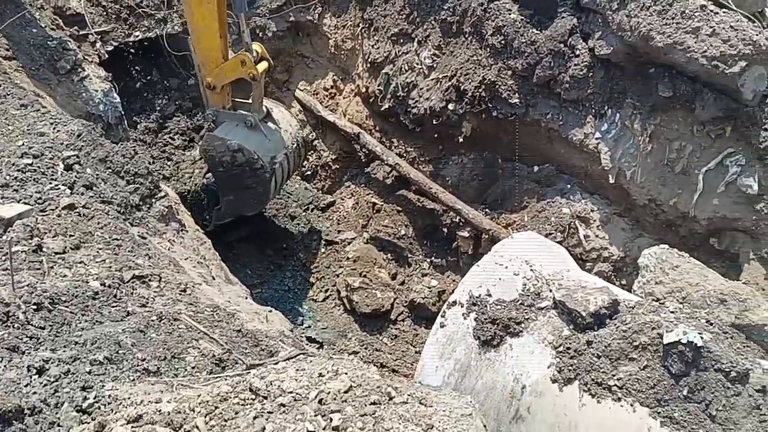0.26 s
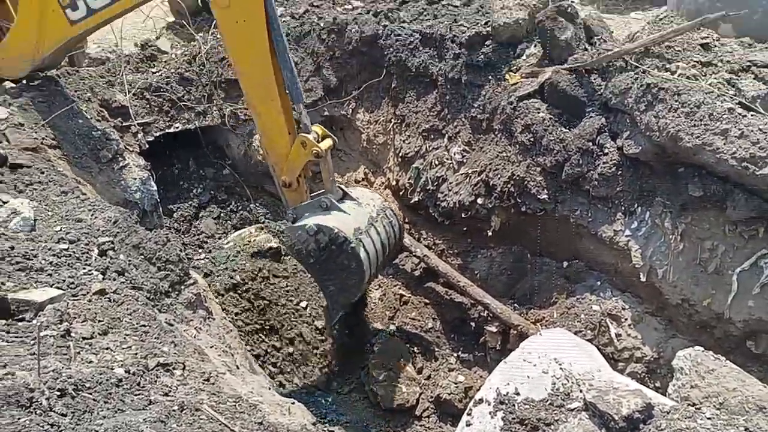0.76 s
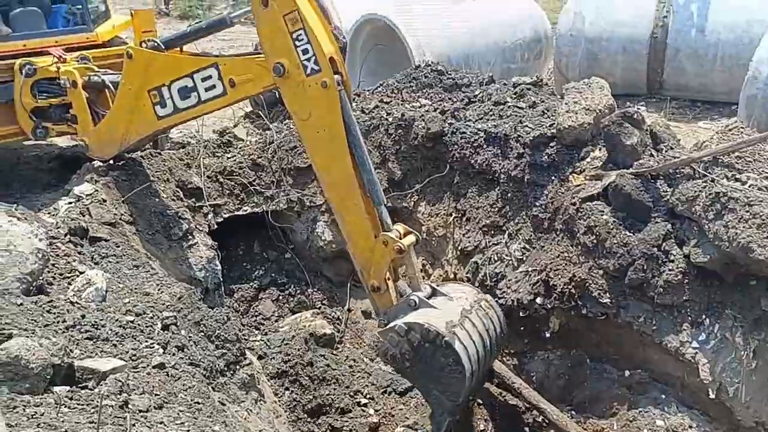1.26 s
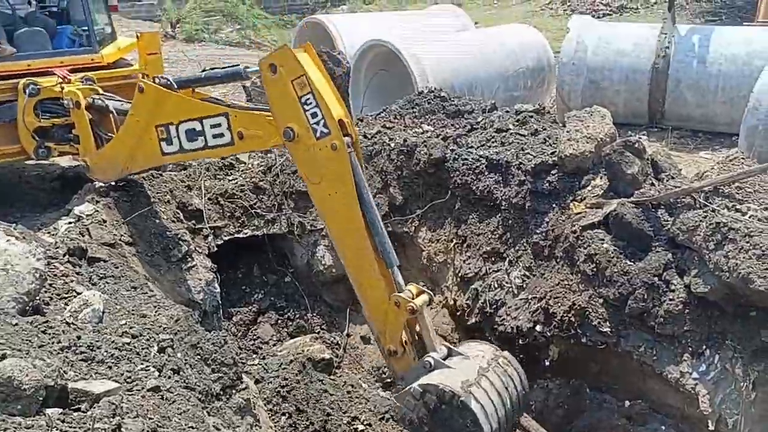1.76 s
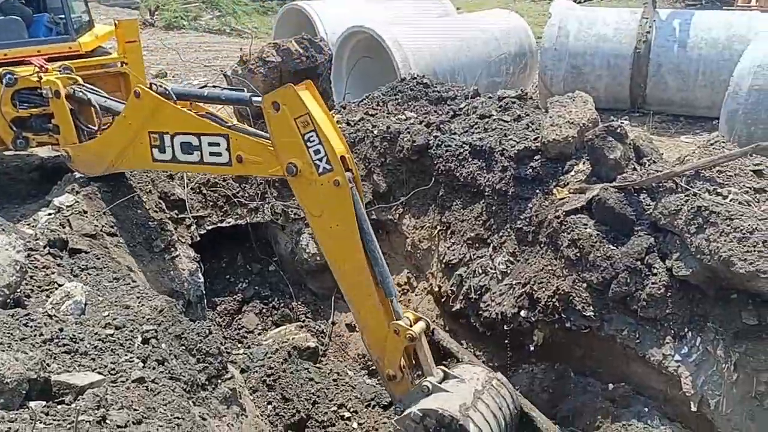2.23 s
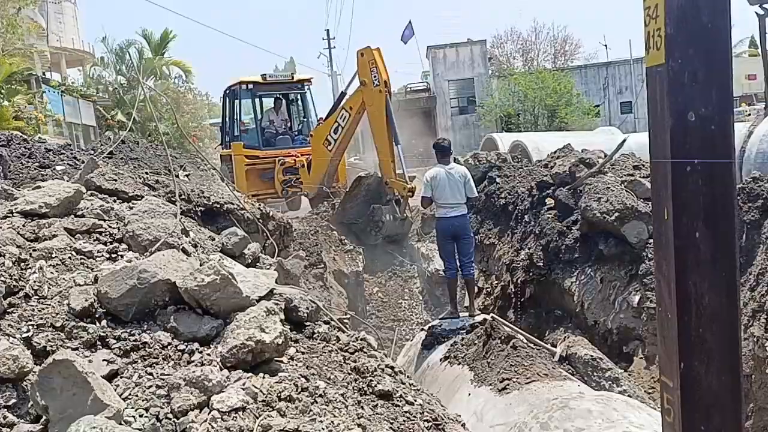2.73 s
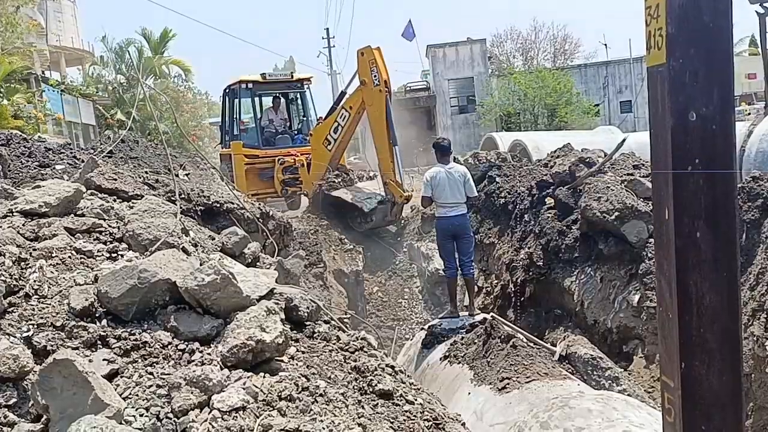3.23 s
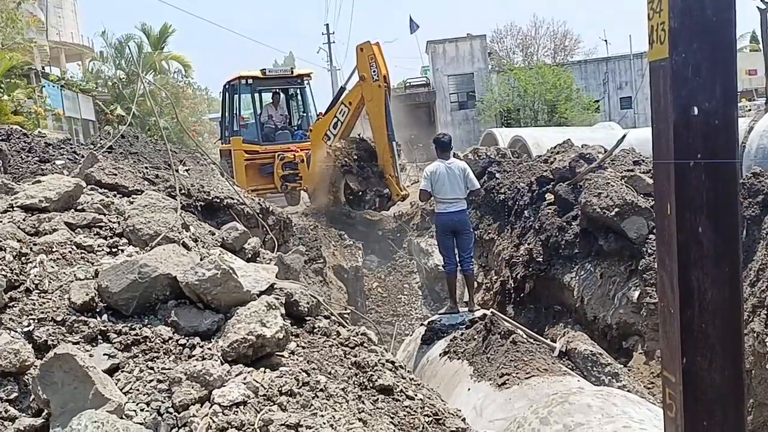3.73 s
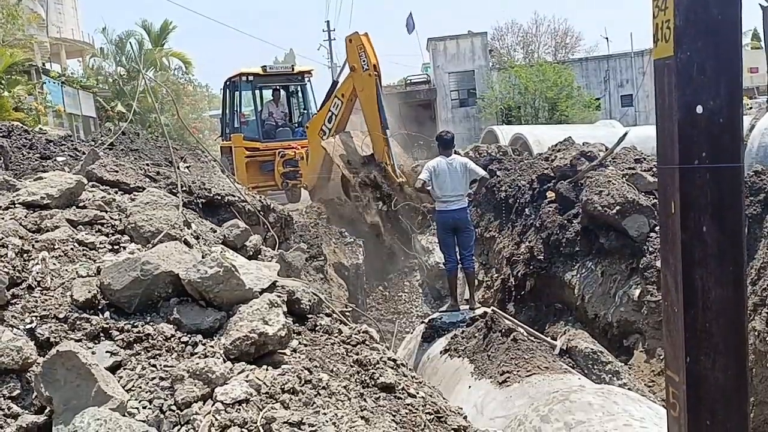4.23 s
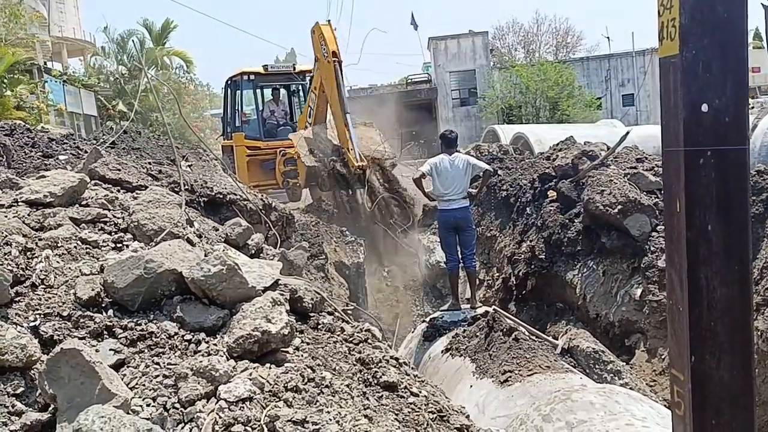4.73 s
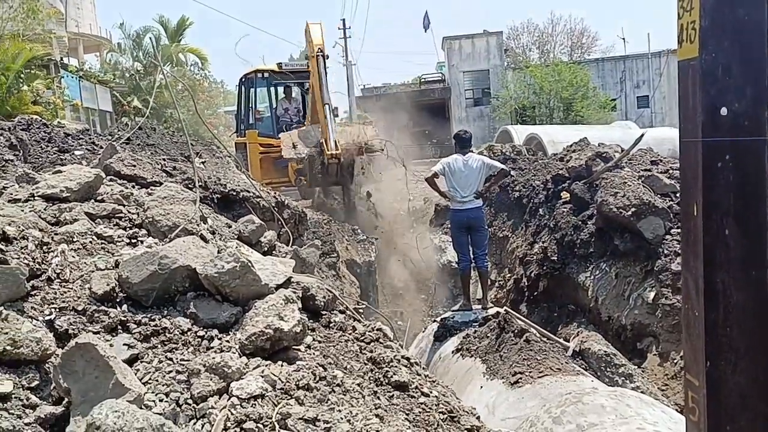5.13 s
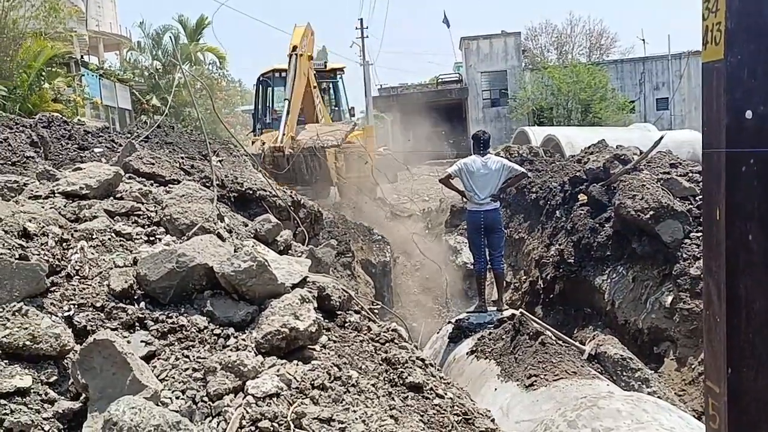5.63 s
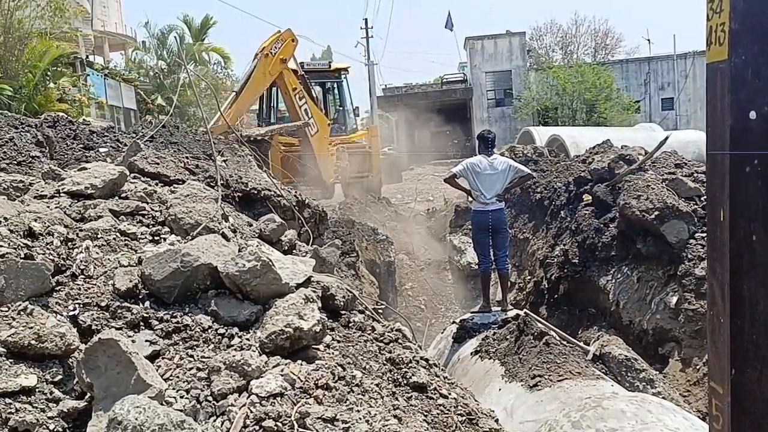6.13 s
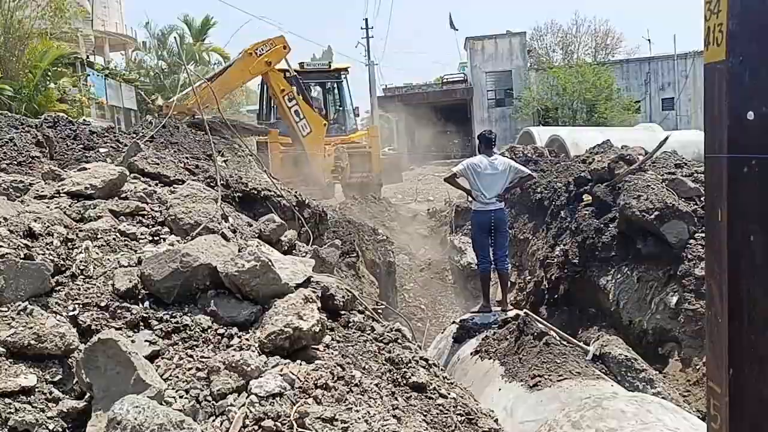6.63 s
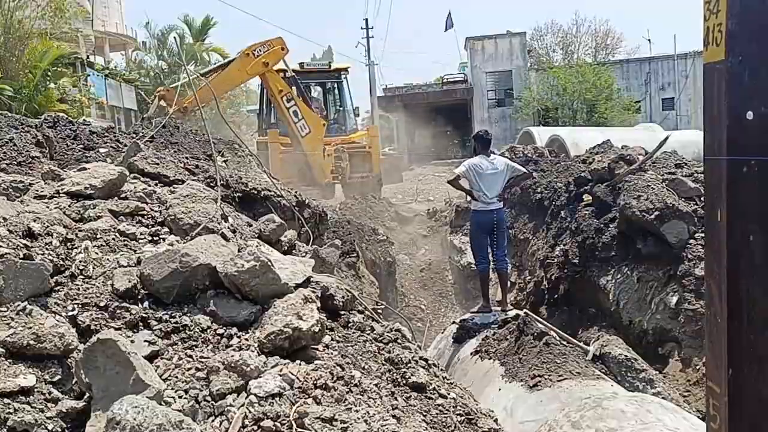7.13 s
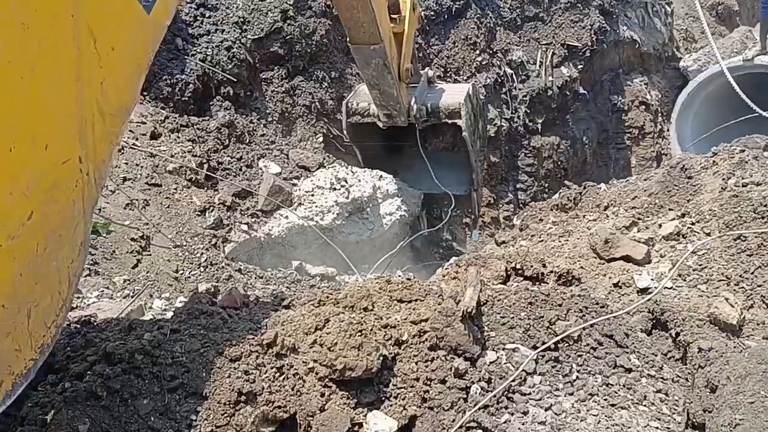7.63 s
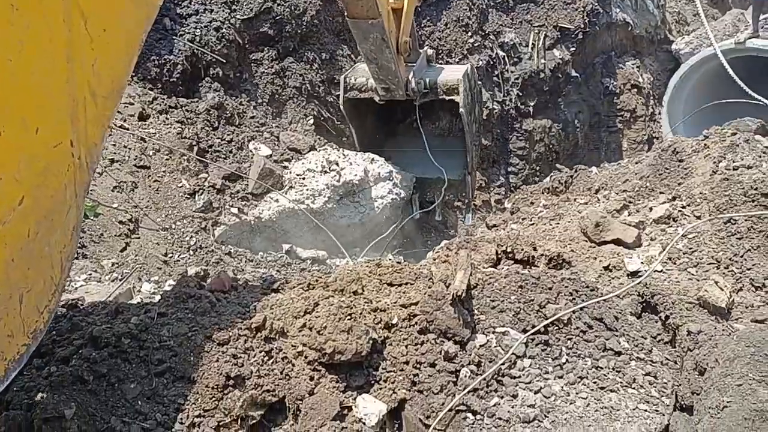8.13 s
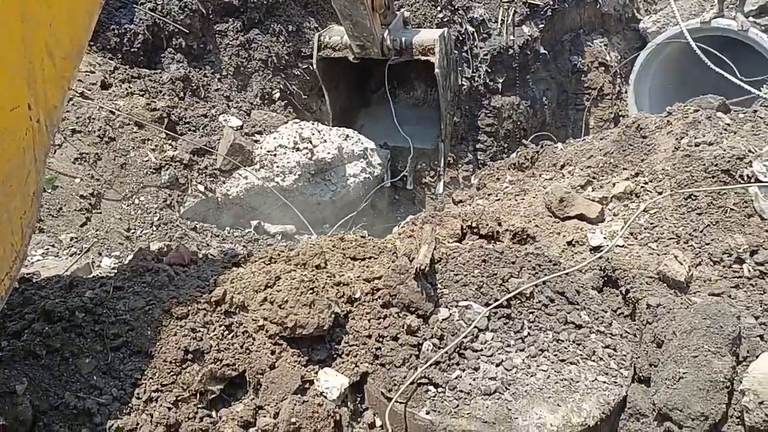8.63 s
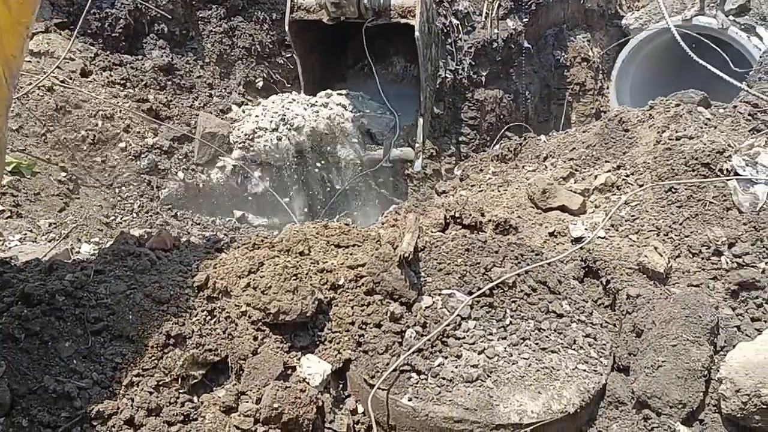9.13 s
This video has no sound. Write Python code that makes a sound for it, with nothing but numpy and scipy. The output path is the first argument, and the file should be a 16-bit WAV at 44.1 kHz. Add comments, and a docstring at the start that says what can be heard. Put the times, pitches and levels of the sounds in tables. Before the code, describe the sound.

A diesel digger runs throughout, its pump whining and dipping under load. Early stone cracks and steel clangs thin into light ticks. After a short cut, rasping bites and a brief squeal lead to trickling, bursting soil. Another cut brings a louder, nearer engine with hard metallic blows and gritty crunches. Stereo phone, open trench, scattered reflections.

```python
"""Backhoe digging a stony trench

A diesel backhoe is heard by a phone from three places in turn, with a short silence between.
The engine is firing tones and puffing noise; its geared hydraulic pump whines, lower under load.
Stick-slip ticks drive the steel bucket's modes: it grinds, clangs and thuds, and now and then squeals.
Stones crack and ring against it, and coloured grains are the soil that spills and trickles.
The trench walls scatter the sound, so the two microphone ports agree best in the bass."""
import sys
import numpy as np
from scipy import signal
from scipy.fft import rfft, irfft, next_fast_len
from scipy.io import wavfile
from scipy.ndimage import uniform_filter1d

SR = 44100
rng = np.random.default_rng(int(sys.argv[2]) if len(sys.argv) > 2 else 0)


def natural_amplitude(level_db):
    """Convert a level in decibels to a linear amplitude factor, elementwise."""
    exponent = np.asarray(level_db, float) / 20
    return 10 ** exponent


def master(y):
    """Save y as 16-bit WAV."""
    cut = np.clip(np.atleast_2d(y).T, -1, 1)
    pcm = np.round(cut * 32767)  # scale
    wavfile.write(sys.argv[1], SR, pcm.astype(np.int16))


N = 412776
T = np.arange(N) / SR
F = np.fft.rfftfreq(next_fast_len(N), 1 / SR)
PATHS = 3  # straight, and off the trench walls to each port

# listening places: start_s, end_s, fade_in_s, left_lag_ms, left_minus_right_db near 500 Hz,
# the same in db near 3300 Hz, scatter_corner_hz, whine_reference_db
PLACES = [(0, 2.459, 0.00031, 0.27, -3.5, 17, 590, -49.5),
          (2.551, 7.437, 0.043, 0.033, 2.5, 0.85, 393, -57),
          (7.526, 9.37, 0.058, 0.45, -7.5, 6.5, 895, -39)]
# unloaded engine per place: whine_hz, firing_db, firing_octave_db, pump_db, pump_octave_db
ENGINE = [(2611, -50, -39.5, -55.5, -72), (2605, -34.5, -33.5, -52, -63),
          (2591, -31.5, -39.5, -29.5, -49.5)]
# upper firing orders: multiple of the firing pitch, level_db against its octave
FIRING_ORDERS = [(3, -14), (4, -15.5)]
# higher pump orders: multiple of the pump pitch, level_db against the whine reference
PUMP_ORDERS = [(3, -3), (4, -9)]
# engine roar, one spectrum per place: frequency_hz, relative_level_db per Hz
ROAR_SPECTRA = [
    [(35, -38), (60, -11.5), (109, -7), (330, -21), (520, -24.5), (880, -23), (1400, -25), (6500, -44),
     (10600, -53.5), (12200, -42), (15000, -63)],
    [(35, -22), (60, -6.5), (107, -4.5), (289, -15.5), (399, -21.5), (2530, -26), (3050, -30.5),
     (15000, -60)],
    [(35, -47), (60, -15), (229, -12.5), (282, -10.5), (390, -17.5), (850, -11.5), (1350, -19),
     (2530, -20.5), (15000, -55)],
]
# overall roar per place: level_db
ROAR_DB = [-38, -34, -23.5]
# hydraulic load: time_s, share of full pressure (0-1)
LOAD = [(0, 0.7), (.25, 0.83), (1.2, 0.48), (2.3, 0.1), (2.5, 0.38), (3.2, 0.59), (3.8, 0.42), (5.2, 0.34),
        (6.5, 0.37), (7.4, 0.48), (7.55, 0.14), (8.05, 0.42), (8.22, 0.97), (8.66, 0.84), (8.78, 0.47),
        (9.0, 0.77), (9.36, 0.4)]
# a low hum while the boom swings: start_s, length_s, level_db
HUMS = [(3.846, 0.31, -47), (4.248, 0.2, -44), (4.803, .32, -46), (5.882, 0.18, -48)]
# bucket plate modes, damped by soil: mode_hz, drive_db
BUCKET_MODES = [(135, -11), (184, -1), (262, 3), (344, -7), (590, -8), (690, -9), (780, -7), (850, -6),
                (960, -5), (1060, -9), (1480, -11.5), (1870, 0), (2300, -3), (2490, -1), (4300, -9)]
# steel squealing on stone: start_s, length_s, mode_hz, level_db
SQUEALS = [(3.658, 0.11, 2455, -26), (3.665, 0.17, 1870, -28), (3.853, 0.045, 1486, -33),
           (6.663, 0.082, 1460, -38)]
# stones knocking the bucket: start_s, strike_db, brightest_hz
KNOCKS = [(0.121, -18, 2280), (0.274, -5.5, 790), (0.314, -9.5, 2360), (0.343, -11, 2510),
          (0.447, -25, 2620), (0.478, -19, 885), (0.742, -18, 3133), (0.777, -12.5, 2630),
          (0.917, -23, 5130), (1.097, -20.5, 2437), (1.122, -25, 4520), (1.296, -22.5, 2660),
          (1.36, -15.5, 2380), (1.627, -20.5, 1110), (2.218, -27, 6180), (2.449, -23.5, 2464),
          (2.791, -14, 1670), (2.968, -19, 1790), (3.224, -13.5, 2470), (3.408, -15, 1870),
          (3.431, -10.5, 2420), (3.46, -7.5, 2400), (4.265, -17, 5300), (4.435, -20.5, 3960),
          (4.736, -18.5, 1436), (4.919, -15, 1494), (6.775, -25.5, 800), (7.589, -16.5, 2620),
          (7.647, -13.5, 2120), (7.866, -12, 958), (7.905, -7.5, 2250), (8.352, -0.5, 830), (8.672, 0, 875),
          (8.706, -17, 2270), (8.879, -17, 2540), (8.91, -10.5, 939), (9.032, -3.5, 686.5),
          (9.12, -11, 2170)]
# teeth biting: peak_s, build_up_s, die_away_s, rasp_db, thud_db against the rasp
BITES = [(0.098, 0.068, 0.25, -35.5, 9.5), (0.289, 0.056, 0.11, -22, -2.5), (0.486, 0.052, 0.068, -29, 5.5),
         (0.67, 0.065, 0.18, -39, 8), (0.779, 0.046, 0.077, -20.5, -2.5), (0.89, 0.096, 0.097, -32.5, -5),
         (1.11, 0.052, 0.074, -31, -15), (1.3, 0.027, 0.084, -28, -7), (1.37, 0.021, 0.12, -30.5, -9),
         (1.63, 0.11, 0.075, -39.5, -2), (2.63, 0.043, 0.066, -30.5, -4), (2.8, 0.026, 0.034, -32.5, 6),
         (2.972, 0.55, 0.11, -34.5, -3), (3.16, 0.32, 0.21, -27.5, -0.5), (3.246, 0.07, 0.088, -19, 4.5),
         (3.458, 0.066, 0.11, -19.5, 1.5), (3.739, 0.28, 0.29, -24.5, -12.5), (3.9, 0.14, 0.19, -30, -28),
         (4.29, 0.24, 0.22, -31.5, -18), (4.345, .025, 0.045, -38.5, 13.5), (4.745, 0.01, 0.44, -32, -8.5),
         (4.93, 0.017, 0.29, -31, 0), (5.17, 0.51, 0.53, -34, 0.5), (5.88, 0.24, 0.33, -37, -3),
         (6.79, 0.091, 0.076, -37.5, 11.5), (7.259, 0.054, 0.12, -30.5, 15.5), (7.33, 0.11, 0.17, -21, 5),
         (7.59, 0.034, 0.027, -34, 4), (7.75, 0.13, 0.17, -16, 5.5), (7.868, 0.021, 0.063, -16.5, 4),
         (7.928, 0.06, 0.067, -16, -0.5), (8.1, 0.23, 0.35, -32, 7.5), (8.364, 0.03, 0.051, -23, 4.5),
         (8.48, 0.11, 0.62, -41, 21.5), (8.713, 0.06, 0.055, -10.5, -6.5), (8.776, 0.064, 0.071, -16.5, 1),
         (8.921, 0.11, 0.099, -18, 7), (9.031, 0.063, 0.054, -18.5, 8.5), (9.131, 0.041, 0.085, -17.5, 5),
         (9.21, 0.069, 0.051, -15.5, -16)]
# clang per place, before the share that follows the thud: level_db against the rasp
CLANG_DB = [2, -4.5, 3.5]
# soil pouring off the bucket: peak_s, build_up_s, die_away_s, level_db
SPILLS = [(2.8, 0.031, 0.59, -38.5), (3.43, 0.043, 0.12, -32.5), (3.57, 0.034, 0.037, -27.5),
          (3.78, 0.17, 0.13, -26), (3.908, 0.036, 0.065, -24.5), (4.279, 0.28, 0.67, -36),
          (4.8, 0.066, 0.16, -28), (4.959, 0.063, 0.35, -30), (5.2, 0.29, 0.35, -26),
          (5.55, 0.056, 0.087, -23.5), (5.721, 0.078, 0.41, -32), (6.0, 0.037, 0.1, -23.5),
          (6.59, 0.035, 0.067, -29), (6.718, 0.085, 0.23, -36), (7.27, 0.057, 0.16, -33),
          (7.389, 0.23, 0.17, -32.5), (7.78, 0.084, 0.057, -24), (8.4, 0.075, 0.091, -34),
          (8.775, 0.019, 0.032, -19), (8.92, 0.12, 0.21, -34), (9.213, 0.085, 0.067, -15.5),
          (9.339, 0.019, 0.056, -23.5)]
# clods bursting on the ground: start_s, level_db
CLODS = [(4.061, -35), (5.637, -38), (5.821, -34), (5.915, -31), (5.975, -25), (6.108, -26), (6.47, -39),
         (6.681, -40), (7.086, -33), (8.352, -39), (8.673, -21)]
# loose soil that never stops running, per place: level_db
TRICKLE_DB = [-57.5, -51, -44.5]
# spectrum of running grit: frequency_hz, relative_level_db per Hz
GRIT_SPECTRUM = [(1470, -23), (2500, -5), (2720, -8.5), (4860, -4), (6300, 1), (9150, -11), (12100, -5.5),
                 (15500, -11.5)]

WHINE_PER_FIRING, WHINE_PER_PUMP = 52.0, 9  # pitch ratios
# at full load: the whine drops, the tones grow
SAG_HZ, PUMP_RISE_DB, PUMP_OCTAVE_RISE_DB, FIRING_OCTAVE_RISE_DB = 41.81, 3.5, 24.5, 4.5
HUM_HZ = 472
CLANG_PER_THUD = 0.7  # deeper bites clang more, dB per dB
THUD_LINGER, ROUNDING = 1.37, 0.85  # the thud dies this much slower; swell top: 1 pointed, 2 round
CLOD_DIES_S = 0.051  # to lose 20 dB
TOP_HZ = 15500


def unit(x):
    """Scale to rms 1."""
    return x / np.sqrt(np.mean(x ** 2))


def colour(x, points):
    """Shape the spectrum by (Hz, dB) points on a log axis, rms 1."""
    hz, db = np.array(points, float).T
    gain = natural_amplitude(np.interp(np.log(F + 1), np.log(hz), db))
    size = next_fast_len(N)
    return unit(irfft(rfft(x, size) * gain, size)[:, :N])


def band(x, lo_hz, hi_hz):
    """Band-pass, rms 1."""
    sos = signal.butter(2, [lo_hz, hi_hz], "band", fs=SR, output="sos")
    return unit(signal.sosfilt(sos, x))


def by_place(values):
    """One value per place, held while that place is heard."""
    ends = [place[1] for place in PLACES]
    return np.array(values)[np.searchsorted(ends, T).clip(0, len(PLACES) - 1)]


def walk(rate):
    """Random levels held 1 / rate s and slewed twice; spread near 1."""
    k = int(SR / rate)
    steps = np.repeat(rng.standard_normal(N // k + 1), k)
    return unit(uniform_filter1d(uniform_filter1d(steps, k), k)[:N])


def swells(peak_s, rise_s, fall_s, db):
    """Events that climb 20 dB over their build-up and lose it over their die-away; their powers add."""
    power = np.zeros(N)
    for s, rise, fall, level in zip(peak_s, rise_s, fall_s, db):
        near = slice(max(int((s - 3 * rise) * SR), 0), int((s + 3 * fall) * SR))
        away = np.where(T[near] < s, (s - T[near]) / rise, (T[near] - s) / fall)
        power[near] += natural_amplitude(level - 20 * away ** ROUNDING) ** 2
    return np.sqrt(power)


def lumps(rate, fall_s):
    """A flow level that jumps as a lump lands and then sinks back."""
    hits = rng.exponential(size=N) * (rng.random(N) < rate / SR)
    return 1 + signal.lfilter([1], [1, -np.exp(-1 / (fall_s * SR))], hits)


def grains(rate, spread_db):
    """Random millisecond ticks, many small and few large; each path smears them its own way."""
    size = natural_amplitude(spread_db * np.minimum(rng.exponential(size=N), 6)) * (rng.random(N) < rate / SR)
    return unit(uniform_filter1d(size, size=40) * rng.standard_normal((PATHS, N)))


def clacks(rate, lo_hz, hi_hz, cycles, spread_db):
    """Loose stones hitting each other and the steel: each a short ring of its own pitch and size."""
    out = np.zeros((PATHS, N + SR))
    t = T[:SR // 25]
    for when, pitch, size, *phase in rng.random((int(rate * N / SR), 3 + PATHS)):
        hz = lo_hz * (hi_hz / lo_hz) ** pitch
        loudness = natural_amplitude(-spread_db * np.log(size + 0.0035))
        decay = np.exp(-t * np.sqrt(hz * lo_hz) / cycles)
        i = int(when * N)
        out[:, i:i + len(t)] += loudness * decay * np.sin(2 * np.pi * (hz * t + np.array(phase)[:, None]))
    return unit(out[:, :N])


def ring(x, hz, t60):
    """One mode of a plate, driven by x; it loses 60 dB in t60 seconds."""
    r = np.exp(-np.log(1000) / (max(t60, .01) * SR))
    w = 2 * np.pi * hz / SR
    return signal.lfilter([np.sin(w)], [1, -2 * r * np.cos(w), r * r], x)


def plates(force, lo_hz, hi_hz):
    """Bucket modes in a range, high ones shorter; the contact point wanders, so each swells on its own."""
    return sum(natural_amplitude(db) * ring(force * natural_amplitude(4.5 * walk(20)), hz, 19 / hz ** .78)
               for hz, db in BUCKET_MODES if lo_hz <= hz < hi_hz)


def hums():
    """A soft wavering tone that comes and goes while the boom swings."""
    wave = np.sqrt(2) * natural_amplitude(2.5 * walk(12)) * np.sin(2 * np.pi * HUM_HZ * T + .4 * walk(9))
    return wave * sum(natural_amplitude(db) * np.clip(np.minimum(T - s, s + length - T) / .04, 0, 1)
                      for s, length, db in HUMS)


def tone(phase, db, waver_db, slip):
    """A steady tone that swells (dB) and slips in phase (radians) a little."""
    level = np.sqrt(2) * natural_amplitude(db + waver_db * walk(14))
    return level * np.sin(phase + slip * walk(7.6) + rng.uniform(0, 2 * np.pi))


def engine():
    """Firing orders, the geared pump with its whine, and exhaust roar puffing once a firing."""
    load = np.interp(T, *np.array(LOAD).T)
    free_hz, fire_db, octave_db, pump_db, pump2_db = by_place(ENGINE).T
    whine_db = by_place([place[7] for place in PLACES])
    octave_db = octave_db + FIRING_OCTAVE_RISE_DB * load
    pump_db = pump_db + PUMP_RISE_DB * load
    pump2_db = pump2_db + PUMP_OCTAVE_RISE_DB * load

    # one shaft: firing and pump phases are geared to the whine
    whine = 2 * np.pi * np.cumsum(free_hz - SAG_HZ * load) / SR
    fire, pump = whine / WHINE_PER_FIRING, whine / WHINE_PER_PUMP
    tones = tone(fire, fire_db, .8, .12) + tone(2 * fire, octave_db, 1.4, .15)
    tones += sum(tone(k * fire, octave_db + db, 2.2, 0.45) for k, db in FIRING_ORDERS)
    tones += tone(pump, pump_db, 3.5, .4) + tone(2 * pump, pump2_db, 2.2, .5)
    tones += sum(tone(k * pump, whine_db + db, 3.0, 0.8) for k, db in PUMP_ORDERS)
    tones += tone(whine + 1.2 * walk(130), whine_db - 3.5, 3.5, 1.2)

    noise = rng.standard_normal((PATHS, N)) + 0.25 * grains(2100, 4.9)
    noise = noise * (1 + 0.17 * np.cos(fire)) * natural_amplitude(1.0 * walk(6.7))
    place = by_place(range(len(ROAR_SPECTRA)))
    roar = sum((place == k) * colour(noise, points) for k, points in enumerate(ROAR_SPECTRA))
    # oil rushing through the valves hisses around the whine
    hiss = natural_amplitude(whine_db - 6.0) * band(noise, 2360, 2750)
    return tones, natural_amplitude(by_place(ROAR_DB)) * roar + hiss


def squeals():
    """Fast rubbing holds one plate mode for a moment."""
    rub = rng.standard_normal((PATHS, N))
    out = np.zeros((PATHS, N))
    for s, length, hz, db in SQUEALS:
        arch = np.sqrt(np.clip(1 - (2 * (T - s) / length - 1) ** 2, 0, 1))
        out += natural_amplitude(db) * arch * unit(ring(rub, hz, .045))
    return out


def knocks():
    """Each stone: a sharp crack, a ring at its brightest pitch, rings of its own, a blow to the plates."""
    out, blows = np.zeros((PATHS, N + SR)), np.zeros(N)
    t = T[:SR // 5]
    fade = np.log(1000) * t  # 60 dB per second, sped up below
    for s, db, hz in KNOCKS:
        noise = rng.standard_normal((PATHS, len(t)))
        own_hz, size, *phase = rng.random((2 + PATHS, 7, 1))
        own_hz = 800 * 8 ** own_hz
        crack = band(band(noise, 500, 6000), hz / 3, min(2.5 * hz, 7500)) * np.exp(-t / 0.0045)
        tail = band(noise, hz * .9, hz * 1.08) * np.exp(-fade * np.sqrt(hz) / 3.8)
        waves = np.sin(2 * np.pi * (own_hz * t + np.array(phase)))
        rings = np.sum(size * np.exp(-fade * np.sqrt(own_hz) / 3.5) * waves, axis=1)
        i = int(s * SR)
        out[:, i:i + len(t)] += natural_amplitude(db) * (.45 * crack + .33 * tail + .17 * rings)
        blows[i] += natural_amplitude(db)
    return out[:, :N] + natural_amplitude(-30.5) * plates(blows, 100, 5000)


def digging():
    """Teeth stick and slip over stones: uneven bursts of ticks drive the steel while grit pours."""
    slips = natural_amplitude(2.2 * walk(40))
    force = unit(grains(2400, 2.1) * slips)
    stones = clacks(450, 700, 4800, 7.5, 2.4)
    rasp = unit(.75 * band(force, 996, 3600) + .4 * unit(plates(force, 1400, 5000)) + .65 * stones)
    clang = unit(band(force, 570, 1564) + .75 * unit(plates(force, 400, 1400)))
    thud = unit(band(force, 85, 306) + 0.97 * unit(plates(force, 100, 400)))

    s, rise, fall, rasp_db, thud_db = np.array(BITES).T
    bite = swells(s, rise, fall, rasp_db)
    clang_level = natural_amplitude(by_place(CLANG_DB)) * swells(s, rise, fall, rasp_db + CLANG_PER_THUD * thud_db)
    thud_level = swells(s, rise, THUD_LINGER * fall, rasp_db + thud_db)
    steel = bite * rasp + clang_level * clang + thud_level * thud

    grit = colour(grains(7000, 1.6) * slips * np.sqrt(lumps(18, .03)), GRIT_SPECTRUM)
    clod_s, clod_db = np.array(CLODS).T
    clods = swells(clod_s + .002, .002 + 0 * clod_s, CLOD_DIES_S + 0 * clod_s, clod_db)
    spills = swells(*np.array(SPILLS).T)
    crushed = natural_amplitude(-44.0) * bite  # crushed grit follows the rasp
    return steel + (spills + clods + natural_amplitude(by_place(TRICKLE_DB)) + crushed) * grit


def ports(tones, paths):
    """Per place: the straight path reaches the left port late; the wall paths differ, most in the treble."""
    out, size = np.zeros((2, N)), next_fast_len(N)
    octave = np.log2(F + 1)
    tones, (straight, *walls) = rfft(tones, size), rfft(paths, size)
    low_hump = np.exp(-((octave - np.log2(500)) / 0.63) ** 2)
    high_hump = np.exp(-((octave - np.log2(3300)) / 0.97) ** 2)
    for start, end, fade, lag_ms, low_db, high_db, corner_hz, _ in PLACES:
        share = .56 / (1 + (corner_hz / (F + 1)) ** 2)  # of the power, off the walls
        tilt_db = low_db * low_hump + high_db * high_hump
        gate = np.clip((T - start) / fade, 0, 1) * (T < end)
        for ear, sign in enumerate((1, -1)):
            # each port takes half the lag and half the tilt
            lag = np.exp(-1j * np.pi * F * sign * lag_ms / 1000)
            heard = (tones + straight * np.sqrt(1 - share)) * lag + np.sqrt(share) * walls[ear]
            out[ear] += gate * irfft(heard * natural_amplitude(sign * tilt_db / 2), size)[:N]
    return out


def scene():
    """Engine, pump and bucket as the two ports hear them."""
    tones, roar = engine()
    return ports(tones + hums(), roar + digging() + knocks() + squeals())


def low_pass(x):
    """Removes everything above the highest recorded frequency."""
    return signal.sosfilt(signal.butter(12, 15800, fs=SR, output="sos"), x)


def record(dry):
    """The phone rounds the loudest peaks and cuts the top."""
    rounded = np.tanh(1.099 * dry) / 1.037
    mix = signal.sosfilt(signal.ellip(8, .2, 50, TOP_HZ, fs=SR, output="sos"), rounded)
    return low_pass(mix)


dry = scene()
out = record(dry)
master(out)
```